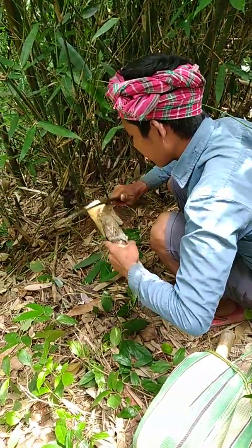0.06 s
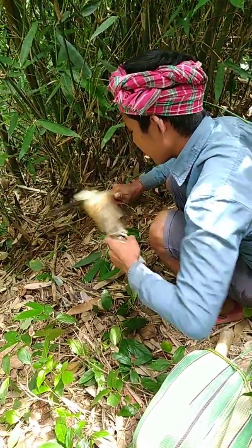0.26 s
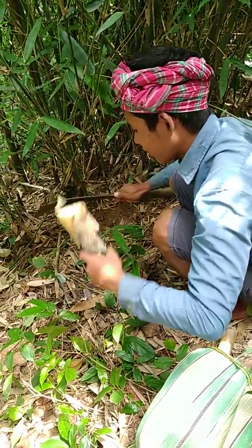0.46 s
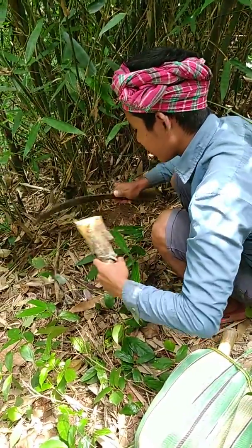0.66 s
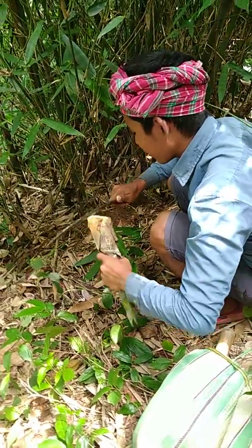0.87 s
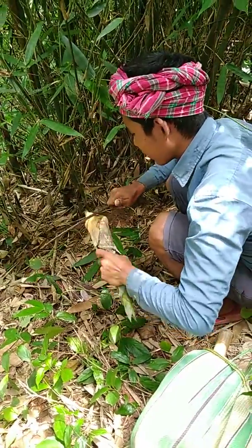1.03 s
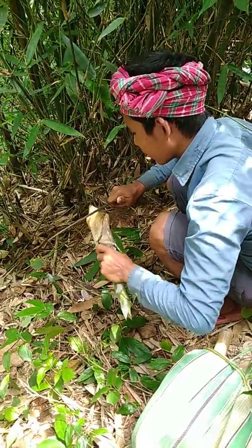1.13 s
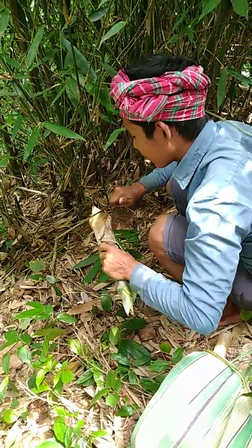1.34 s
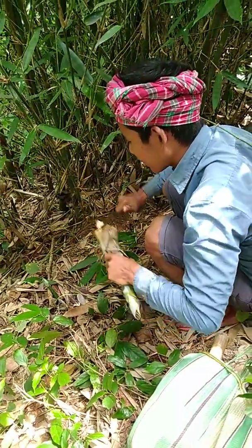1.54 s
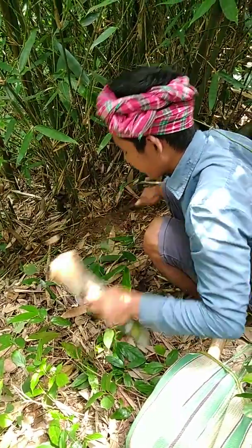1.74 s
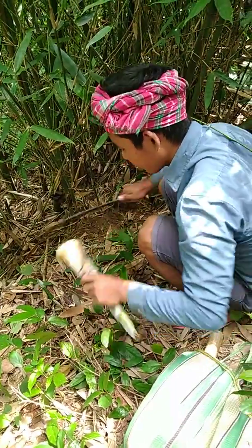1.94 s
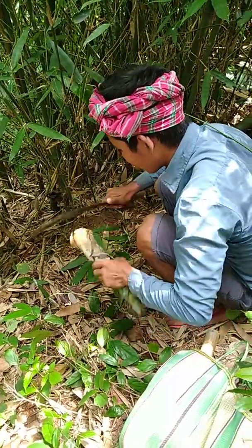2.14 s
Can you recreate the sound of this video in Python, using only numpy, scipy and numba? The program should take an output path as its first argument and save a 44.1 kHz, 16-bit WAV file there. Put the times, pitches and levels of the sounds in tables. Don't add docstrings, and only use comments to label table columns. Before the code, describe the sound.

Dry bamboo sheaths tear and crackle under a blade in short strokes, with faint high insects

```python
import sys
import numpy as np
from scipy import signal
from scipy.fft import rfft, irfft
from scipy.io import wavfile
from scipy.ndimage import uniform_filter1d
from numba import njit

SR = 44100
rng = np.random.default_rng(int(sys.argv[2]) if len(sys.argv) > 2 else 0)


def makeup_ratio(level_db):
    decades = np.asarray(level_db, float) / 20
    return 10 ** decades


def unload_wav(signal):
    wavfile.write(
        sys.argv[1],
        SR,
        np.round(np.clip(np.atleast_2d(signal).T, -1, 1) * 32767).astype(np.int16),
    )


N = 97020
T = np.arange(N) / SR


def curve_db(table, hz):
    points = np.array(table, float)
    return np.interp(np.log(np.maximum(hz, 1)), np.log(points[:, 0]), points[:, 1])


def unit(x):
    return x / np.sqrt(np.mean(x ** 2))


def split(x, order, hz, side):
    return signal.sosfilt(signal.butter(order, hz, side, fs=SR, output="sos"), x)


def band(hz, width_hz):
    b, a = signal.iirpeak(hz, hz / width_hz, SR)
    once = signal.lfilter(b, a, rng.standard_normal(N))
    return unit(signal.lfilter(b, a, once))


def ring(x, hz, width_hz):
    b, a = signal.iirpeak(hz, hz / width_hz / 1.5, SR)
    return signal.lfilter(b, a, signal.lfilter(b, a, x))


@njit
def grains(at, hz, decay, size, length):
    out = np.zeros(length + 4096)
    for k in range(len(at)):
        z = size[k] + 0j
        turn = decay[k] * np.exp(2j * np.pi * hz[k] / SR)
        for i in range(min(4096, int(-6. / np.log(decay[k])))):
            out[at[k] + i] += z.imag
            z *= turn
    return out[:length]


def cracks(colour, rings, dry_db, count):
    spread_db, ring_cycles, split_hz = 1.77, 5.161, 4002.7
    when, pitch, rarity = rng.random((count, 3)).T
    hz = 500 * 32 ** pitch
    size = makeup_ratio(curve_db(colour, hz) - spread_db * np.log(rarity + 0.0018)) * hz
    decay = np.exp(-hz / SR / ring_cycles)
    swarm = unit(grains((when * N).astype(np.int64), hz, decay, size, N))
    body = sum(makeup_ratio(db) * ring(swarm, f, width) for f, width, db in rings)
    sheath = unit(makeup_ratio(dry_db) * swarm + body)
    return split(sheath, 3, split_hz, "low"), split(sheath, 3, split_hz, "high")


def strokes(table, parts, settle_db):
    swell_db, bite_s = 5, 0.0047
    settle_s = 0.16906
    air_hz, air_settle_db, air_fall = 11500, -6, .9
    low_power, high_power, air_power = 0, 0, 0
    for peak, db, swell, fall, body_db in table:
        late = np.maximum(T - peak, 0)
        swelling = swell_db * np.clip((peak - T) / swell, 0, 1)
        bite = 20 * np.maximum(peak - swell - T, 0) / bite_s
        rise = makeup_ratio(2 * (db - swelling - bite))
        power = rise * (makeup_ratio(-40 * late / fall) + makeup_ratio(2 * settle_db - 40 * late / settle_s))
        low_power = low_power + power * makeup_ratio(2 * body_db)
        high_power = high_power + power
        air_settling = makeup_ratio(2 * (settle_db + air_settle_db) - 40 * late / settle_s)
        air_power = air_power + rise * (makeup_ratio(-40 * late / fall / air_fall) + air_settling)
    low, high = parts
    air = signal.sosfiltfilt(signal.butter(2, air_hz, "high", fs=SR, output="sos"), high)
    return low * np.sqrt(low_power) + (high - air) * np.sqrt(high_power) + air * np.sqrt(air_power)


# peak_s, level_db, swell_s, fall_s (per 20 dB), low_body_db
TEAR_STROKES = [(.168, -50.5, 0.019276, 0.1755, 5), (.245, -48, 0.08565, 0.1341, 2),
                (.262, -43, .015, .06, -3), (.28, -36, .012, .05, -3), (.3, -30.5, .018, .025, -5),
                (.705, -52, 0.01042, 0.3335, -4), (.728, -49.5, 0.0164, 0.1421, -1),
                (.752, -47.5, .011, .05, 3), (.815, -56, 0.01178, 0.0644, -2.5), (1.503, -49, .009, .1, -1),
                (1.52, -51, .01, .05, -2), (1.535, -46, 0.02041, 0.0128, -3.5), (1.642, -46, .008, .05, -8),
                (1.662, -37, .014, .06, -4), (1.679, -30, .006, .0124, -6),
                (1.751, -47.5, 0.002, 0.0772, 2.5), (1.781, -51.5, 0.003303, 0.1958, -5),
                (1.84, -56, .02, .1, -1), (2.03, -51, 0.033944, 0.1626, -4)]
# pitch_hz, level_db
TORN_COLOUR = [(500, -21), (1000, -20.5), (2000, -9), (4400, -9), (5400, -12), (6700, -0.5), (10000, -7),
               (16000, -16)]
# pitch_hz, width_hz, level_db
TORN_RINGS = [(814.81, 40, -8), (1250.1, 462.4, 1), (1916.2, 341.3, 2), (2500, 649.8, 4.5),
              (4366.8, 567, 5), (5991.7, 373.9, 2.5), (6545.4, 156.34, -3.5), (7758.7, 192.6, -2.5),
              (10763, 349.3, -6.5)]


def tears():
    return strokes(TEAR_STROKES, cracks(TORN_COLOUR, TORN_RINGS, dry_db=5.5, count=60000), -21)


# peak_s, level_db, swell_s, fall_s (per 20 dB), low_body_db
SCRAPE_STROKES = [(1.12, -66, .008, .06, 4), (1.2, -60, .005, .02, 3), (1.275, -60, .008, .02, 0),
                  (.5, -71, 0.00966, 0.1207, -26), (.655, -69.5, 0.0211, 0.0439, -5),
                  (1.145, -57.5, 0.02841, 0.1059, -4.5), (1.185, -57, 0.01283, 0.05096, 4.5),
                  (1.26, -56, 0.016056, 0.04461, 0), (1.318, -56, 0.005238, 0.07077, -1),
                  (1.338, -59.5, 0.0133, 0.01577, -2), (1.405, -60.5, 0.02737, 0.07395, 1),
                  (1.435, -56, 0.01292, 0.0879, -3.5), (1.6, -54.5, 0.005834, 0.02807, 1),
                  (1.883, -59, 0.005055, 0.03866, -8), (1.911, -58, 0.00405, 0.02728, 0.5),
                  (1.945, -68, 0.00528, 0.1576, 5), (2.09, -62, 0.01367, 0.121, -17),
                  (2.198, -56, 0.00476, 0.0565, 7)]
# pitch_hz, level_db
RUBBED_COLOUR = [(900, -39.5), (2000, -5), (4500, -11), (7000, -2), (10000, -9.5), (16000, -15.5)]
# pitch_hz, width_hz, level_db
SCRAPED_RINGS = [(1642, 168.7, 4.891), (2300, 140, 10), (2608.3, 243.7, 8.099), (3211.7, 190, 3.4),
                 (4000, 140, 8), (5133.6, 150, 7.067), (6319.8, 170, 6.4), (6894, 350, 7.156),
                 (7338.1, 340, 8.4), (9384.1, 200, 8.3), (10600, 1200, 5), (11973, 220, 2.3),
                 (14254, 460, 4.3), (15017, 240, 5.6)]


def scrapes():
    return strokes(SCRAPE_STROKES, cracks(RUBBED_COLOUR, SCRAPED_RINGS, dry_db=1.5, count=60000), -12.5)


# peak_s, level_db, swell_s, fall_s (per 20 dB), low_body_db
CREAK_STROKES = [
    (.918, -54, .004, .1, -6),
    (.94, -58, 0.00422, 0.0212, -6),
    (.956, -55.5, 0.004144, 0.0869, -7.5),
    (1., -64, 0.0104, 0.0005, -2.5),
]
# pitch_hz, width_hz, level_db
BENT_RINGS = [(hz, 160, 0) for hz in (2314.3, 2649, 3270.8, 3900.7, 4826.2, 5286, 6050.2, 6450, 7294.5, 7832.9)]


def creaks():
    return strokes(CREAK_STROKES, cracks(RUBBED_COLOUR, BENT_RINGS, dry_db=-26, count=30000), -19)


# peak_s, level_db, swell_s, fall_s (per 20 dB), low_body_db
NICK_STROKES = [
    (.093, -62, .003, .03, 7),
    (.115, -76, .01, .1, 3),
    (.137, -74, .004, .03, 3),
]
# pitch_hz, width_hz, level_db
NICKED_RINGS = [(2400, 500, 6), (4050, 150, 5), (6100, 250, -2), (6600, 200, 0), (7400, 500, -3),
                (9700, 300, 4)]


def nicks():
    return strokes(NICK_STROKES, cracks(RUBBED_COLOUR, NICKED_RINGS, dry_db=-20, count=30000), -20)


# start_s, peak_db, lowest_hz, highest_hz, t60_s
FIBRE_SNAPS = [(.0905, -52, 2000, 2800, .03), (2.1965, -50, 2000, 14000, .02),
               (.7398, -38, 2200, 6500, .012), (.752, -44, 1200, 5000, .015),
               (.8098, -50, 1500, 7000, .015), (.9136, -47, 2200, 8000, .012),
               (.9375, -49, 2200, 9000, .01), (.9535, -46, 4500, 8000, .01), (1.198, -54, 2000, 9000, .015),
               (1.3147, -50, 5000, 13000, .015), (1.4325, -45, 6000, 12000, .012),
               (1.4508, -44, 2500, 11000, .008), (1.4675, -50, 5000, 12000, .008),
               (1.4935, -50, 2000, 12000, .01), (1.5965, -45, 2200, 11000, .012),
               (1.638, -46, 6000, 11000, .015), (1.652, -42, 4000, 11000, .012),
               (1.6733, -30, 5500, 10000, .015), (1.677, -27, 5500, 12000, .012),
               (1.7477, -34, 1300, 15500, .012), (1.7515, -44, 1300, 8000, .02),
               (1.7772, -36, 8000, 15000, .008), (1.781, -44, 1800, 8000, .012),
               (1.8245, -45, 3000, 12000, .008), (1.842, -47, 2000, 11000, .01),
               (1.879, -48, 5000, 15000, .012), (1.9083, -45, 2200, 8000, .015),
               (2.024, -42, 6500, 9000, .012), (.2755, -33, 4000, 9000, .015),
               (.2985, -28, 6000, 10000, .012)]


def snaps():
    ring_db, spread_s = -9, .0015
    start, peak_db, lowest, highest, t60 = np.array(FIBRE_SNAPS).T[:, :, None]
    place, delay = rng.random((2, len(start), 12))
    hz = lowest + (highest - lowest) * (np.arange(12) + place) / 12
    at = start + spread_s * delay ** 2
    size = makeup_ratio(peak_db + ring_db) + 0 * hz
    decay = makeup_ratio(-60 / t60 / SR) + 0 * hz
    return grains((at.ravel() * SR).astype(np.int64), hz.ravel(), decay.ravel(), size.ravel(), N)


# start_s, level_db, pitch_hz, t60_s
SHOOT_THUDS = [(.09, -80, 440.7, 0.4903), (.165, -72.5, 395.9, 0.355), (0.292, -73, 418.6, .06),
               (.742, -59, 420, .2), (.745, -67, 270, .2), (.743, -62, 780, .12), (.743, -68, 590, .12),
               (.802, -68, 420, .15), (.812, -72, 480, .06), (1.295, -72, 860, .08), (.995, -74, 1560, .05),
               (1.14, -72, 1800, .08), (1.18, -72, 1400, .1), (1.91, -72, 1550, .05), (1.94, -72, 1550, .1),
               (1.94, -73, 1220, .1), (.17, -64, 870, .5), (.17, -65, 1250, .5), (1.665, -64, 850, .15),
               (.5, -74, 6900, .4), (.64, -72, 6050, .15), (.65, -73, 6500, .2),
               (1.465, -78, 364.1, 0.5768)]


def thuds():
    out = 0
    for start, db, hz, t60 in SHOOT_THUDS:
        attack = np.clip((T - start) / .004 + 1, 0, 1)
        fade = makeup_ratio(db - 60 * np.maximum(T - start, 0) / t60)
        out = out + fade * attack * band(hz, min(hz * .3, 150))
    return out


# start_s, length_s, level_db, start_hz, end_hz
BLADE_SQUEAKS = [
    (0.55876, 0.064, -73, 14100, 14050),
    (0.64139, .055, -67.5, 14150, 13550),
    (.545, 0.016, -78.5, 12600, 11000),
    (2.12, .05, -61, 2580, 2570),
    (2.17, 0.03844, -62.5, 2300, 3000),
]


def squeaks():
    out = 0
    for start, length, db, start_hz, end_hz in BLADE_SQUEAKS:
        along = np.clip((T - start) / length, 0, 1)
        level = makeup_ratio(db + 3 * band(100, 70)) * np.sin(np.pi * along)
        hz = start_hz + (end_hz - start_hz) * along
        out = out + level * np.sin(2 * np.pi * np.cumsum(hz) / SR)
    return out * np.sqrt(2)


# time_s, main_song_db, lower_song_db
INSECT_LEVELS = [(0, -105, -108), (0.061, -104, -106), (.078, -80, -100), (.11, -100, -91.5),
                 (.42, -71, -77.5), (.47, -72, -78.5), (.52, -80.5, -82.5), (0.559, -67, -73.5),
                 (0.621, -76, -70), (0.679, -67.5, -73), (.95, -72, -91), (1.06, -75, -90.5),
                 (1.121, -64.5, -99), (1.451, -64.5, -92.5), (1.9, -73.5, -85.5), (2.002, -76, -93),
                 (2.14, -81, -100), (2.2, -64.5, -88.5)]


def insects():
    main_hz, lower_hz, throb_hz, throb_db = 8630, 4344.3, 68.421, 2.2
    time, main_db, lower_db = np.array(INSECT_LEVELS).T
    throb = throb_db * band(throb_hz, 41)
    main = makeup_ratio(np.interp(T, time, main_db) + throb - 1)
    lower = makeup_ratio(np.interp(T, time, lower_db) + throb / 2 - 1)
    song = band(main_hz, 110) + makeup_ratio(-21) * band(main_hz * 3 / 2, 180)
    return main * song + lower * band(lower_hz, 80)


def scene():
    work = tears() + scrapes() + creaks() + nicks() + snaps()
    work = split(work, 6, 950, "high")
    notch_hz, notch_width_hz = 1003, 130.62
    work = signal.lfilter(*signal.iirnotch(notch_hz, notch_hz / notch_width_hz, SR), work)
    return (work + thuds() + squeaks() + insects())[None]


# pitch_hz, threshold_db (per Hz)
GATE_THRESHOLD = [(300, -118), (2000, -106), (7000, -100), (16000, -106)]


def suppress(x):
    release_s, uneven_db, drift_s, gate_power, floor_db = 0.030966, 9, .14, 1.45, -30
    f, t, z = signal.stft(x, SR, nperseg=256, noverlap=192, scaling="psd")
    hop_s = t[1] - t[0]
    keep = np.exp(-hop_s / release_s)
    power = 2 * abs(z) ** 2
    released = signal.lfilter([1 - keep], [1, -keep], power)
    held = np.maximum(released, uniform_filter1d(power, size=5) / 2)
    drift = uniform_filter1d(rng.standard_normal(z.shape), int(drift_s / hop_s))
    drift = uniform_filter1d(drift, size=2, axis=0)
    limit = makeup_ratio(2 * (curve_db(GATE_THRESHOLD, f)[:, None] + uneven_db * unit(drift)))
    gain = (held / (held + limit)) ** gate_power + makeup_ratio(floor_db)
    return signal.istft(z * gain, SR, nperseg=256, noverlap=192, scaling="psd")[1][:N]


# pitch_hz, level_db (per Hz)
HISS_COLOUR = [(25, -13), (90, -7), (400, -5.5), (1300, -16.5), (2200, -13), (12600, -14), (12900, -34.5)]


def residual_hiss():
    colour = makeup_ratio(curve_db(HISS_COLOUR, np.fft.rfftfreq(N, 1 / SR)))
    return makeup_ratio(-83.5) * unit(irfft(rfft(rng.standard_normal(N)) * colour, N))


def low_pass(x):
    return signal.sosfilt(signal.butter(12, 16360, fs=SR, output="sos"), x)


def record(dry):
    cut = signal.sosfilt(signal.ellip(8, .2, 40, 15950, fs=SR, output="sos"), dry[0])
    mix = (suppress(cut) + residual_hiss())[None]
    return low_pass(mix)


dry = scene()
out = record(dry)
unload_wav(out)
```